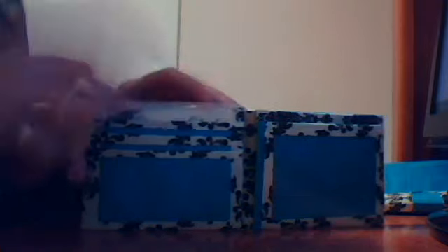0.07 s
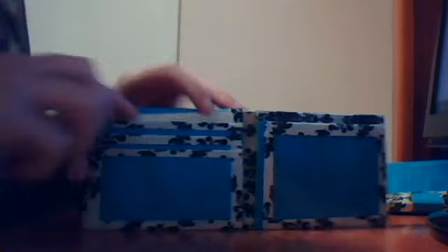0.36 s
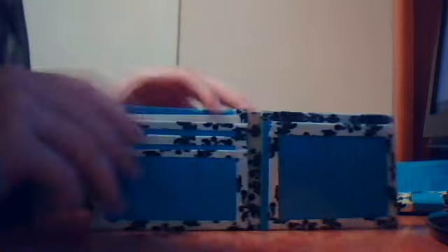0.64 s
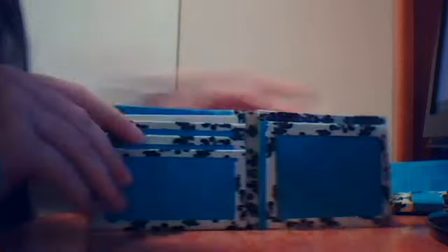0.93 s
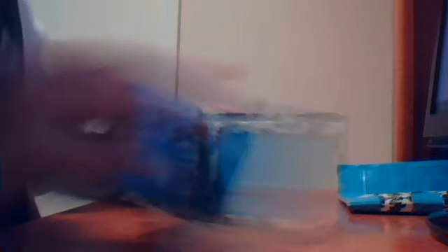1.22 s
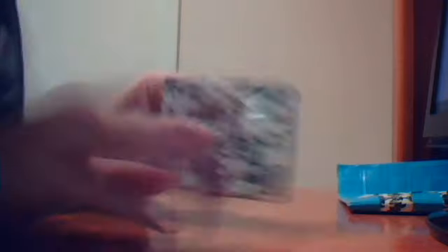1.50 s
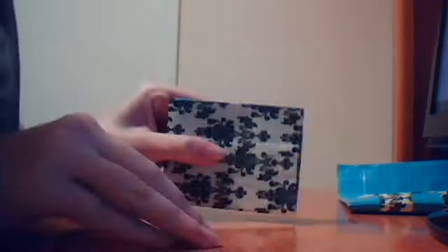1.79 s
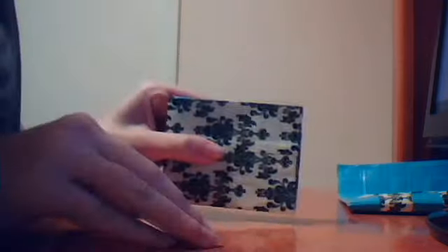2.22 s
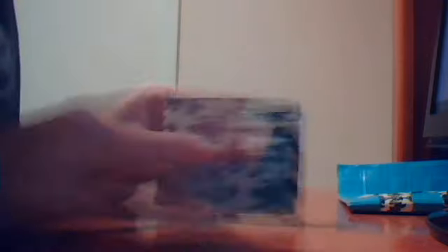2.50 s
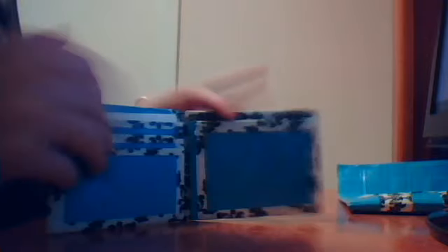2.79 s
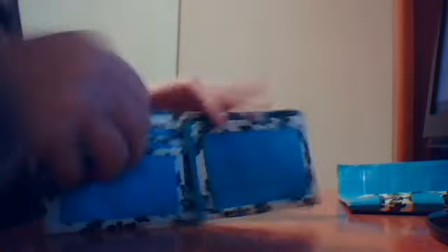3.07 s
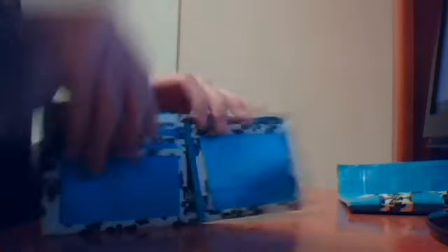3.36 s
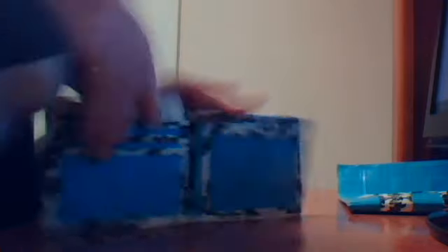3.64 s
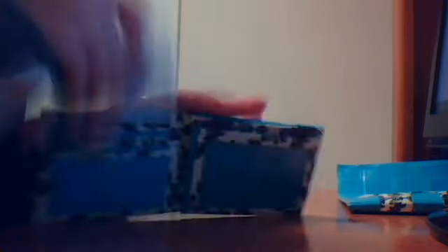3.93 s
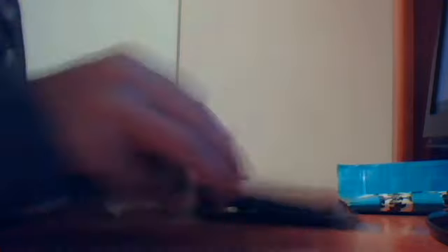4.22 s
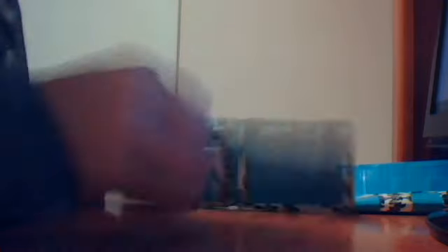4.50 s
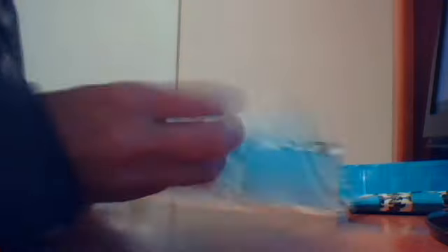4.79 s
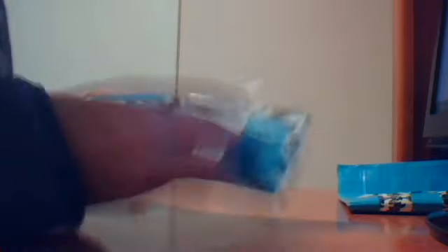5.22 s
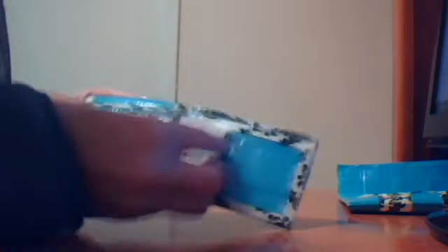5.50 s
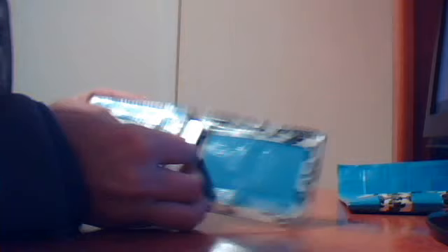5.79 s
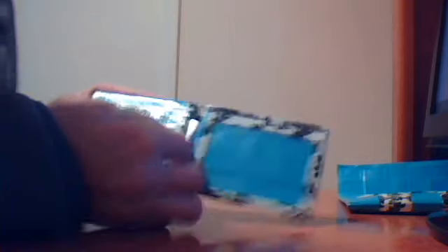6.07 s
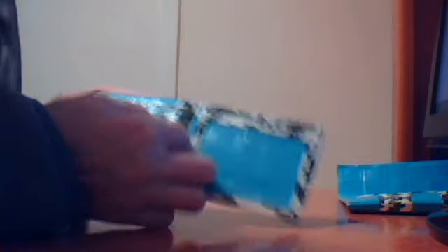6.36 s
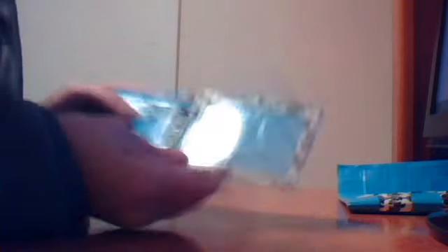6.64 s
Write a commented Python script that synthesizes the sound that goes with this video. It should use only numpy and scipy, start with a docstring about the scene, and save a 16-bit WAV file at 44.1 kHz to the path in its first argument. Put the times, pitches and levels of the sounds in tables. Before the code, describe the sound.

Irregular, hollow knocks ring through a wooden desk top, heard up close in a small room, as a stiff tape wallet is handled on it. The knocks start gently, are strongest before the middle, then crowd together and thin out into soft bumps. Between them the wallet's edge drags dully and its creases give small snaps and faint crinkles. A quiet fan hum and steady microphone hiss lie underneath.

```python
"""A wooden desk top booms as a wallet made of tape is folded, opened and stood on it.
Each touch rings the desk's modes, heard up close because the microphone sits on the same desk.
The wallet's stiff edge clacks and drags; its tape snaps, crinkles and rustles faintly under the fingers.
Behind it all are a small room's ring, a fan's low hum and the microphone's hiss."""
import sys
import numpy as np
from scipy import signal
from scipy.fft import rfft, irfft
from scipy.io import wavfile

SR = 44100
rng = np.random.default_rng(int(sys.argv[2]) if len(sys.argv) > 2 else 0)


def master_out(mix):
    """Clip the mix to full scale and print it as 16-bit PCM to the path in sys.argv[1]."""
    frames = np.transpose(np.atleast_2d(mix))
    ceiling = np.clip(frames, -1, 1)
    pcm = np.round(ceiling * 32767).astype(np.int16)
    wavfile.write(sys.argv[1], SR, pcm)


N = 304761
TIME = np.arange(N) / SR
FIRM_DB = -24.5   # the force of a firm blow

# Wallet and hand hit the desk; each spot favours its own mix of bass, thump and rap modes.
# start_s, force_db, bass_db, thump_db, rap_db
KNOCKS = [(0.4404, -49, 6, 3, 2), (0.469, -47, 8.5, 3, -22), (0.61, -51, 7, -10, -4),
          (0.7593, -41.5, 6, 1, 5.5), (0.9987, -27.5, 0.5, -12, 4), (2.3865, -25, 1.5, 12.5, 8.5),
          (2.632, -24, 3, -0.5, 5), (3.218, -53, -12, -5, 12), (3.228, -43, -18, -12, 7),
          (3.439, -51.5, 3, 4, -1.5), (3.5092, -37, 6, 5.5, 2.5), (3.6314, -27.5, -6.5, 2, -12),
          (3.7309, -33.5, -4, -2, -12.5), (4.017, -37.5, 0, 4, 7), (4.411, -44, 5, 2, -3),
          (4.468, -36, -2, 3.5, -14), (5.2197, -48, 12, 4, 1.5), (5.732, -60, 12.5, -3.5, -3),
          (6.333, -38.5, 9, 6.5, 10), (6.4639, -50, 6.5, 6, 1)]


def knocks(firm_cutoff_hz=716, db_per_octave=49.5, settle_s=0.072, settle_db=-16):
    """Blows boom through the desk, firmer ones shorter in contact and so brighter; each settles softly."""
    out = np.zeros(N)
    for start_s, force_db, bass_db, thump_db, rap_db in KNOCKS:
        cutoff_hz = np.clip(firm_cutoff_hz * 2 ** ((force_db - FIRM_DB) / db_per_octave), 100, 4000)
        boom = butter(desk_ring(bass_db, thump_db, rap_db), cutoff_hz, "low", order=4)
        add(out, start_s, from_db(force_db) * boom)
        second_touch = butter(desk_ring(bass_db=-6, thump_db=thump_db, rap_db=-22), 307, "low", order=4)
        add(out, start_s + settle_s * rng.uniform(0.9, 0.97), from_db(force_db + settle_db) * second_touch)
    return out


# The woody ring of the desk top: pitch_hz, level_db, t60_s
DESK_MODES = [(79, -39.5, .184), (108.5, -23, 0.42), (137.6, -12, 0.23), (157.4, -10, 0.095),
              (184, -16.5, 0.056), (216.6, -15, 0.5), (241.9, -5.5, 0.24), (255.9, -8, .18),
              (293.8, -6, 0.15), (396.2, -0.5, 0.072), (424.3, -13.5, 0.15), (460.4, -8, 0.074),
              (483.3, -2.5, 0.049), (646, -18, 0.088), (739, -29.5, 0.089), (806, -32, 0.13),
              (868, -35, 0.15)]
# Low bending waves travel slower, so the bass lands late: pitch_hz, lag_s
BENDING_LAG = [(140, .0101), (260, .002), (400, 0)]


def desk_ring(bass_db, thump_db, rap_db):
    """The desk's answer to a click; where it is struck decides how much each group of modes takes."""
    out = np.zeros(SR)
    for k, (hz, level_db, t60_s) in enumerate(DESK_MODES):
        lag_s = np.interp(hz, *np.transpose(BENDING_LAG))
        t = np.maximum(TIME[:SR] - lag_s, 0)
        spot_db = np.interp(hz, [140, 190, 244, 275, 400], [bass_db, thump_db, 0, 0, rap_db])
        out += (-1) ** k * from_db(level_db + spot_db - 60 * t / t60_s) * np.sin(2 * np.pi * hz * t)
    return out


# Dull scrapes of the wallet's edge across the wood: start_s, length_s, level_db
DRAGS = [(0.429, 0.14, -64), (2.924, 0.24, -65.5), (3.171, 0.053, -59.5), (3.236, 0.11, -50.5),
         (3.758, 0.18, -54), (4.356, 0.27, -57.5)]


def drags(cutoff_hz=590):
    """The edge sticks and slips, shaking the desk's modes."""
    out = np.zeros(N)
    friction = slips(per_s=400, spread_db=2.5)
    shaken_desk = signal.fftconvolve(friction, desk_ring(bass_db=1, thump_db=-9, rap_db=2))[:N]
    scrape = butter(shaken_desk, cutoff_hz, "low", order=4)
    for start_s, length_s, level_db in DRAGS:
        add(out, start_s, from_db(level_db) * stroke(scrape, start_s, length_s))
    return out


# The hard midrange clack as the wallet's edge strikes the desk: pitch_hz, width_hz, gain_db
CLACK_RESONANCES = [(1054, 380, 2.5), (1310, 310, 1.5), (1780, 120, -2.5), (2600, 430, -6.5)]


def clacks(lead_s=0.00195, firm_clack_db=-68, cutoff_hz=2470):
    """The stiff edge rings the desk's high modes just ahead of each boom; soft tape dulls the top."""
    out = np.zeros(N)
    landings = [(start_s - lead_s, firm_clack_db + 1.26 * (force_db - FIRM_DB) + 0.49 * rap_db)
                for start_s, force_db, _, _, rap_db in KNOCKS]
    slap = (4.0147, -62.5)   # the wallet tips over and falls flat: start_s, level_db
    for start_s, level_db in landings + [slap]:
        high_modes = body(burst(t60_s=0.041, rattle_db=-10), CLACK_RESONANCES)
        add(out, start_s, from_db(level_db) * rms_one(butter(high_modes, cutoff_hz, "low", order=6)))
    return out


# Creases in the tape snap over: start_s, level_db, pitch_hz
CREASE_SNAPS = [(0.4609, -60, 1880), (0.9248, -62, 1270), (3.2301, -58, 2100), (3.819, -63, 1310),
                (4.1463, -51.5, 1420), (4.368, -61, 1980), (4.8274, -57.5, 2330), (4.9646, -51.5, 1730),
                (6.3038, -59, 1640)]


def snaps(panel_db=-26, crisp_db=-27.5):
    """Each crease buckles, ringing a patch of panel at its own pitch with a crisp tick from the skin."""
    out = np.zeros(N)
    for start_s, level_db, pitch_hz in CREASE_SNAPS:
        buckle = burst(t60_s=0.04, rattle_db=-16)
        panel = from_db(panel_db) * rms_one(panel_patch(buckle, pitch_hz))
        crisp = from_db(crisp_db) * rms_one(skin(buckle))
        add(out, start_s, from_db(level_db) * (panel + crisp))
    return out


# Fingers slide over the tape: start_s, length_s, panel_db, crisp_db
FINGER_SLIDES = [(3.207, 0.072, -79, -90), (3.755, 0.19, -79.5, -89), (4.027, 0.14, -83, -84.5),
                 (4.327, 0.18, -75.5, -87), (4.775, .075, -87, -96), (5.228, .14, -96, -83.5),
                 (5.411, .13, -93, -84)]
# The two patches of the wallet's panel that flex under a finger: pitch_hz, gain_db
FLEXED_PATCHES = [(1350, -1.5), (2050, -0.5)]


def rustles():
    """Sticky, uneven slips flex the panel, while fine friction hisses on the plastic skin."""
    out, panel = np.zeros(N), np.zeros(N)
    for pitch_hz, gain_db in FLEXED_PATCHES:
        friction = slips(per_s=470, spread_db=3.5)
        panel += from_db(gain_db) * rms_one(panel_patch(friction, pitch_hz, width_share=0.28))
    crisp = skin(slips(per_s=1500, spread_db=2))
    for start_s, length_s, panel_db, crisp_db in FINGER_SLIDES:
        add(out, start_s, from_db(panel_db) * stroke(panel, start_s, length_s))
        add(out, start_s, from_db(crisp_db) * stroke(crisp, start_s, length_s))
    return out


def crinkles(window_s=0.36, level_db=-92, spread_db=3):
    """A small crease gives way near each knock, while the fingers press hardest; only the skin sounds."""
    out = np.zeros(N)
    for knock_s, *_ in KNOCKS:
        offset, size = rng.uniform(-1, 1, 2)
        tick = rms_one(skin(burst(t60_s=0.04, rattle_db=-14.5)))
        add(out, knock_s + offset * window_s / 2, from_db(level_db + spread_db * size) * tick)
    return out


def panel_patch(x, pitch_hz, width_share=0.38):
    """A flexed patch of the wallet's panel rings broadly about one pitch."""
    width_hz = width_share * pitch_hz
    return resonance(resonance(x, pitch_hz, width_hz), pitch_hz, width_hz)


# The tape's plastic sheen: pitch_hz, width_hz, gain_db
SKIN_RESONANCES = [(5340, 910, 3), (6240, 1500, -6)]


def skin(x):
    """The tape's plastic skin rings only in the crisp top end."""
    return butter(body(x, SKIN_RESONANCES), [3800, 8000], "band")


# The small room holds on to its lows longest: band_hz, t60_s
ROOM_DECAY = [(100, 0.95), (250, 0.75), (500, 0.13), (1200, 0.22), (8000, 0.16)]


def room(x, build_s=0.013):
    """A diffuse tail builds up, then each octave dies at its own rate."""
    t, tail = TIME[:SR], np.zeros(SR)
    for hz in 100 * 2.0 ** np.arange(7):
        band = butter(rng.standard_normal(SR), [hz / np.sqrt(2), hz * np.sqrt(2)], "band")
        tail += band * from_db(-60 * t / at_hz(ROOM_DECAY, hz))
    tail *= 1 - np.exp(-(t / build_s) ** 2)
    return signal.fftconvolve(x, rms_one(tail) / np.sqrt(SR))[:N]


# The fan's wavering tones: pitch_hz, width_hz, level_db
FAN_TONES = [(165, 11, -85.5), (239.6, 10, -67.5), (321, 3, -72), (1085, 3, -91)]
# The colour of its rumble: frequency_hz, relative_db
FAN_SPECTRUM = [(20, -20), (55, -16.5), (90, -11.5), (135, -7.5), (235, -5.5), (330, -18.5), (410, -13.5),
                (520, -20), (900, -32), (2000, -87)]


def fan(rumble_db=-67.5):
    """A fan hums in narrow bands of noise over a steady low rumble."""
    hum = np.zeros(N)
    for pitch_hz, width_hz, level_db in FAN_TONES:
        tone = resonance(rng.standard_normal(N + SR), pitch_hz, width_hz)[SR:]   # skip the swell-in
        hum += from_db(level_db) * rms_one(tone)
    return butter(hum, 1800, "low") + from_db(rumble_db) * shaped_noise(FAN_SPECTRUM)


# The colour of the hiss: frequency_hz, relative_db
HISS_SPECTRUM = [(300, -34), (700, -5.5), (1100, -3), (2000, -7), (3300, -10), (5300, -11.5), (7500, -13),
                 (9100, -16), (10400, -23), (13000, -48.5)]


def microphone_hiss(level_db=-76):
    """The microphone's own steady noise floor."""
    return from_db(level_db) * shaped_noise(HISS_SPECTRUM)


def slips(per_s, spread_db):
    """Friction: tiny slips at random moments and of uneven size."""
    slipping = rng.random(N) < per_s / SR
    polarity = rng.choice([-1, 1], N)
    size = from_db(spread_db * np.clip(rng.normal(size=N), -2, 2))
    return slipping * polarity * size + 1e-18


def stroke(source, start_s, length_s):
    """A stretch of friction sound at unit power that swells quickly and eases off."""
    part = source[int(start_s * SR):int((start_s + length_s) * SR)]
    along = np.linspace(0, 1, len(part))
    return rms_one(part * np.sqrt(along) * (1 - along))


def burst(t60_s, rattle_db):
    """One sharp contact, then a quickly dying rattle of micro-contacts."""
    t = TIME[:SR // 10]
    return (t == 0) + rng.choice([-1, 1], len(t)) * from_db(rattle_db - 60 * t / t60_s)


def body(x, resonances):
    """Resonances in parallel."""
    return sum(from_db(gain_db) * resonance(x, hz, width_hz) for hz, width_hz, gain_db in resonances)


def resonance(x, hz, width_hz):
    """Two-pole band-pass with gain 1 at its peak."""
    radius = np.exp(-np.pi * width_hz / SR)
    feedforward = np.array([1, 0, -1]) * (1 - radius ** 2) / 2
    feedback = [1, -2 * radius * np.cos(2 * np.pi * hz / SR), radius ** 2]
    return signal.lfilter(feedforward, feedback, x)


def shaped_noise(spectrum):
    """Steady noise at unit power with a given spectrum."""
    gain = from_db(at_hz(spectrum, np.arange(N // 2 + 1) * SR / N))
    return rms_one(irfft(rfft(rng.standard_normal(N)) * gain, N))


def at_hz(points, hz):
    """Read a table on a log-frequency axis."""
    knots, values = np.transpose(points)
    return np.interp(np.log(np.maximum(hz, 1)), np.log(knots), values)


def butter(x, hz, kind, order=2):
    """Causal Butterworth filter."""
    return signal.sosfilt(signal.butter(order, hz, kind, fs=SR, output="sos"), x)


def from_db(db):
    """Decibels to gain."""
    return 10 ** (np.asarray(db) / 20)


def rms_one(x):
    """Scale to unit power."""
    return x / np.sqrt(np.mean(x ** 2) + 1e-20)


def add(track, start_s, sound):
    """Mix a sound into a track from start_s on."""
    start = int(np.clip(round(start_s * SR), 0, N - 1))
    track[start:start + len(sound)] += sound[:N - start]


def scene():
    """Desk and wallet up close in a small room, over fan and hiss, in mono."""
    desk = butter(knocks() + drags(), 55.5, "high")   # the microphone takes little deep bass
    wallet = clacks() + snaps() + crinkles() + rustles()
    reverb = from_db(-27) * room(desk) + from_db(-14) * room(wallet)
    return (desk + wallet + reverb + fan() + microphone_hiss())[None]


def record(dry):
    """A steep low-pass takes off the air above 10.6 kHz."""
    return signal.sosfilt(signal.ellip(10, 0.1, 70, 10600, fs=SR, output="sos"), dry)


dry = scene()
out = record(dry)
master_out(out)
```